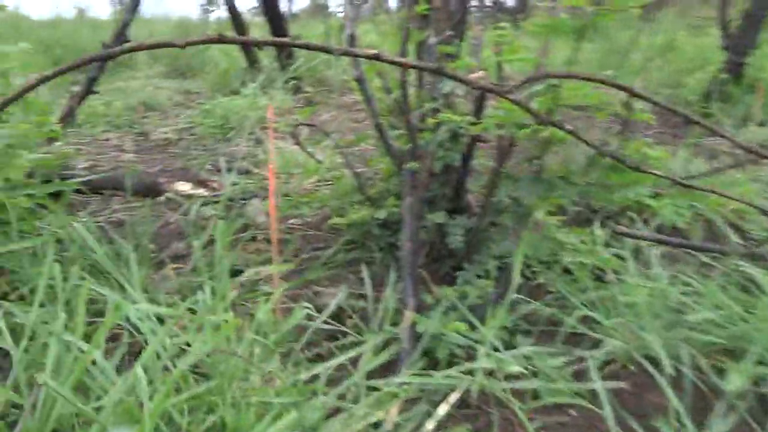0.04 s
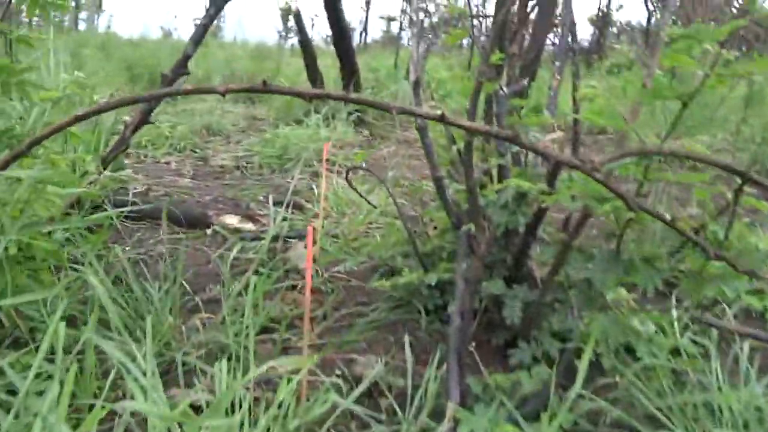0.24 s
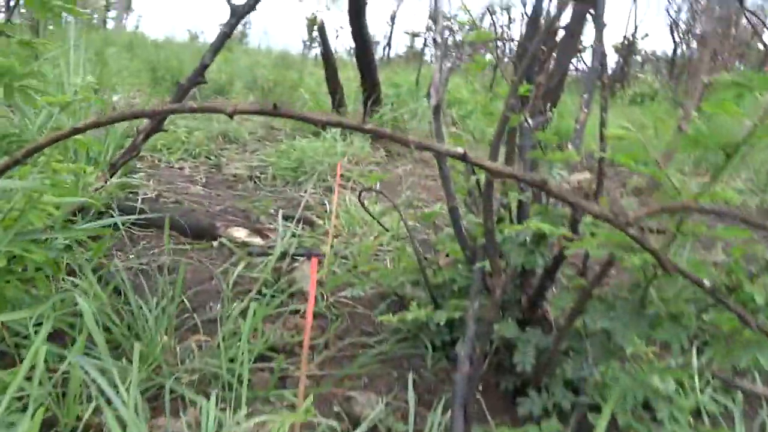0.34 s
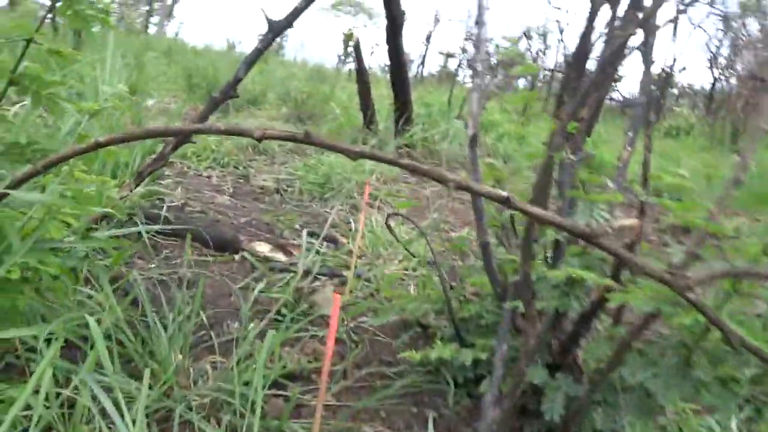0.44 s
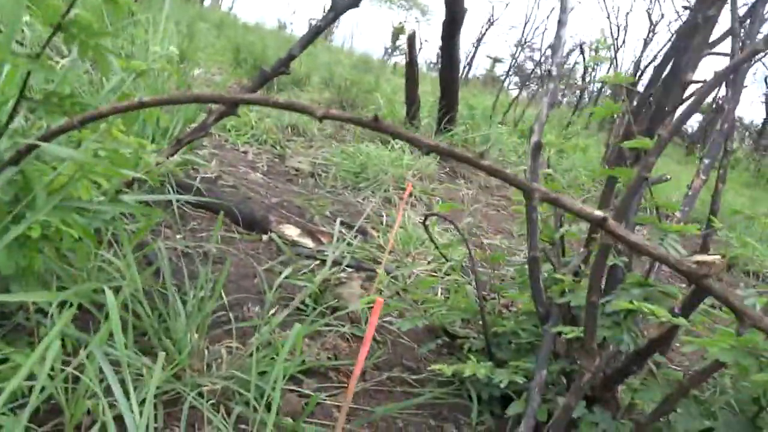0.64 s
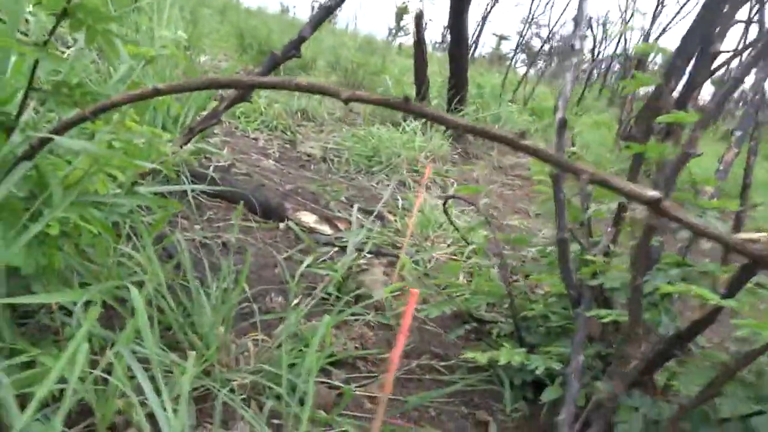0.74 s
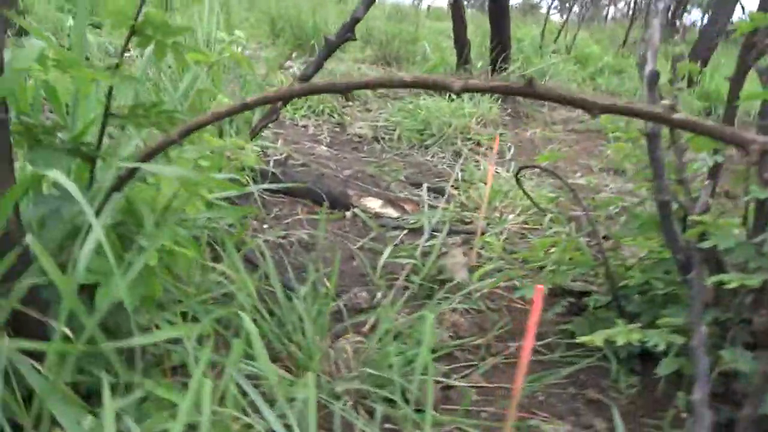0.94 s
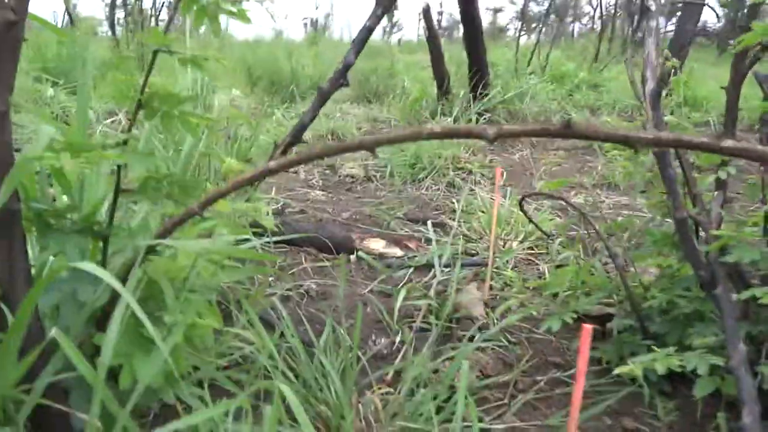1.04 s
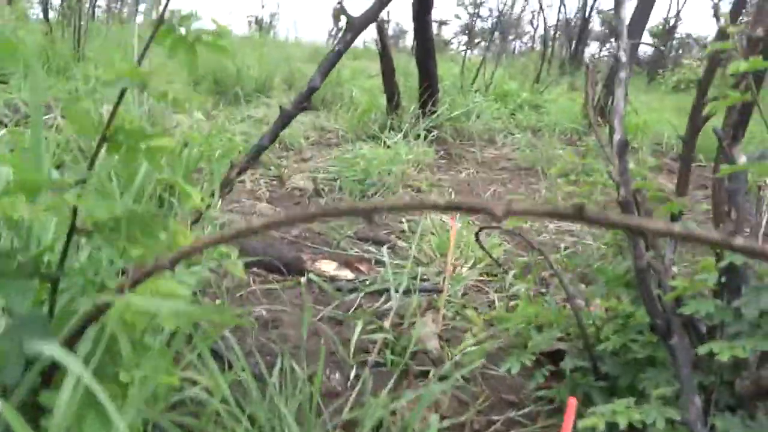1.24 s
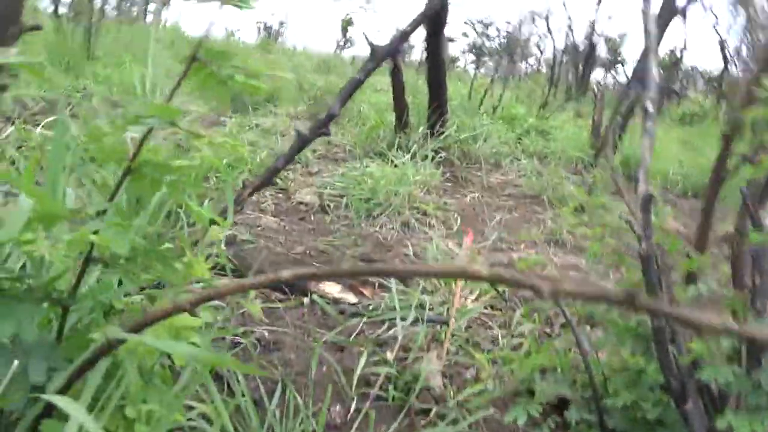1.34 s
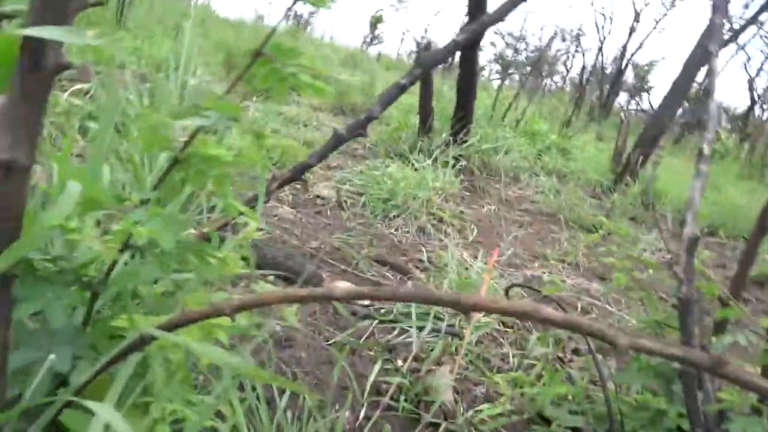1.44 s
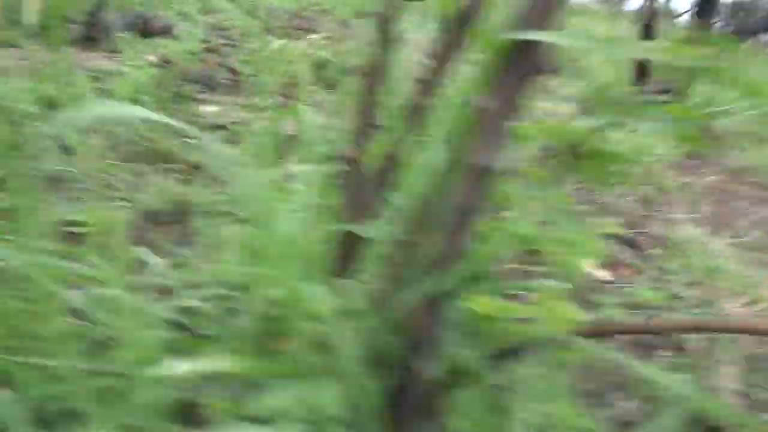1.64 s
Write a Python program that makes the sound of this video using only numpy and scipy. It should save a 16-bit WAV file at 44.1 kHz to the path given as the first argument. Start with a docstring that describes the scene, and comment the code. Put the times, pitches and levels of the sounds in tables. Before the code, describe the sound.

A crunching step through dry brush and grass, twigs snapping, with low rumble buffeting the microphone

```python
"""A step through tall grass and dry brush, close to a hand-held camera.
Over a faint outdoor hiss of shaped noise, low rumble buffets the microphone; a few faint, thin wavering tones
swell and fade. Blades and leaves swish past the legs as dense filtered grains, with brief scuffs among them.
Then the sole presses down: litter crumbles in dull grains, twigs crunch and dry stems snap as ringing fractures.
More buffets follow with soft low thumps of damped sine within them, and fainter cracks, snaps and swishes."""
import sys
import numpy as np
from scipy import signal
from scipy.fft import rfft, irfft, next_fast_len
from scipy.io import wavfile
from scipy.ndimage import uniform_filter1d, map_coordinates

SR = 44100
rng = np.random.default_rng(int(sys.argv[2]) if len(sys.argv) > 2 else 0)


def put_to_file(sound):
    """Save the sound as 16-bit audio at rate SR, in the file named by the first command-line argument."""
    columns = np.atleast_2d(sound).T  # one column per channel
    safe = np.clip(columns, -1, 1)
    whole_steps = np.round(safe * 32767)
    wavfile.write(sys.argv[1], SR, whole_steps.astype(np.int16))


N = 74970  # samples, 1.7 s
HIT_S, HIT_WINDOW_S = 0.08, 0.005  # length of a short hit, span its level refers to


def amp(db):
    """Decibels to gain."""
    return 10 ** (np.asarray(db) / 20)


def unit(x):
    """Scale to rms 1."""
    return x / np.sqrt(np.mean(x ** 2) + 1e-20)


def along(points, hz):
    """Read a curve of (Hz, value) points on a log frequency axis."""
    f, v = np.transpose(points)
    return np.interp(np.log(hz + 1), np.log(f + 1), v)


def curves(rows):
    """One value per sample for each column after the time."""
    s, *cols = np.transpose(rows)
    return [np.interp(np.arange(N) / SR, s, c) for c in cols]


def wobble(rate):
    """A smooth random curve, rate knots a second."""
    knots = rng.standard_normal(N // 20)
    return map_coordinates(knots, [np.arange(N) * rate / SR], mode="wrap")


def coloured(x, spectrum):
    """Filter x to a (Hz, dB) shape with minimum phase, so attacks stay sharp."""
    n = x.shape[-1]
    m = 2 * next_fast_len(n)
    gain = amp(along(spectrum, np.fft.rfftfreq(m, 1 / SR)))
    cepstrum = irfft(np.log(gain + 1e-6), m)
    # folding the cepstrum forward in time makes the filter causal
    cepstrum[1:m // 2] *= 2
    cepstrum[m // 2 + 1:] = 0
    response = np.exp(rfft(cepstrum))
    return irfft(rfft(x, m) * response, m)[..., :n]


def panned(x, pan_db):
    """Place a sound between left and right; positive leans left."""
    return x * amp(np.array([[pan_db], [-pan_db]]) / 2)


def spread(pair, side_db, pan_db):
    """Two unrelated sounds as the middle and the width of one stereo sound of rms 1."""
    mid = unit(pair[0])
    side = amp(side_db) * unit(pair[1])
    return unit(panned(np.array([mid + side, mid - side]), pan_db))


def grains(rate, scatter_db, smooth_db):
    """Two streams of tiny random ticks, rate a second, on a bed of noise."""
    struck = rng.random((2, N)) < rate / SR
    sign = rng.choice([-1, 1], (2, N))
    strength = amp(scatter_db * np.clip(rng.standard_normal((2, N)), -2, 2))
    bed = amp(smooth_db) * rng.standard_normal((2, N))
    return unit(struck * sign * strength) + bed


def patchy(x, depth_db):
    """Random gain patches over time and frequency: each leaf has its own colour."""
    z = signal.stft(x, nperseg=512)[2]
    field = rng.standard_normal(z.shape[1:])
    field = uniform_filter1d(field, size=7, axis=0)
    field = uniform_filter1d(field, size=12, axis=1)
    return signal.istft(z * amp(depth_db * unit(field)), nperseg=512)[1][:, :N]


def swells(rows, side_db, pan_db, skirt_db):
    """Short grainy swells of friction, changing by skirt_db an octave away from their own centre frequency."""
    out, t = np.zeros((2, N)), np.arange(N) / SR
    for s, length, db, hz in rows:
        band = [(hz * 2.0 ** octave, skirt_db * abs(octave)) for octave in range(-2, 3)]
        rub = coloured(grains(1500, scatter_db=2, smooth_db=-9.5), band)
        swell = np.exp(-(2 * (t - s) / length) ** 2 / 2)
        out += amp(db) * swell * spread(rub, side_db, pan_db)
    return out


def hit(x):
    """Scale a short sound so its energy equals rms 1 over the hit window."""
    return x / np.sqrt(np.sum(x ** 2) / (HIT_WINDOW_S * SR) + 1e-20)


def fracture(t60, spectrum, fibre_rate, break_db):
    """One sharp break, set break_db against the whole dying run of tearing fibres that follows."""
    t = np.arange(int(HIT_S * SR)) / SR
    torn = rng.random(len(t)) < fibre_rate / SR
    fibres = torn * rng.standard_normal(len(t)) * amp(-60 * t / t60)
    fibres[0] = rng.choice([-1, 1]) * amp(break_db) * np.linalg.norm(fibres)
    return hit(coloured(fibres, spectrum))


def ringing(push, hz, t60):
    """One damped mode driven by a push."""
    t = np.arange(len(push)) / SR
    mode = np.cos(2 * np.pi * hz * t) * amp(-60 * t / t60)
    return hit(signal.fftconvolve(push, mode)[:len(t)])


def add(out, s, x):
    """Mix x into out at time s."""
    i = max(round(s * SR), 0)
    out[:, i:i + x.shape[-1]] += x[..., :N - i]


def open_air():
    """Steady noise shaped into a faint, wide outdoor hiss."""
    # colour of the open air: f/Hz, level/dB
    air_colour = [(20, -11), (50, 23), (120, 0), (300, 1), (650, -1.5), (1500, 1.5), (2800, -5),
                  (3800, -10), (7300, -7.5), (8500, -9), (10400, -5), (16000, -24)]
    level_db = -54
    hiss = coloured(rng.standard_normal((2, N)), air_colour)
    return amp(level_db) * spread(hiss, side_db=-9, pan_db=0)


def buffeting():
    """Lumpy rumble shakes the camera and reaches the two sides a moment apart."""
    # strength of the buffets: t/s, level before trim/dB
    buffet_levels = [(0.0, -52.5), (0.08, -55.5), (0.132, -37.5), (0.16, -34.5), (0.178, -50),
                     (0.22, -38.5), (0.243, -24.5), (0.262, -48.5), (0.288, -24.5), (0.338, -28.5),
                     (0.375, -46), (0.397, -23.5), (0.425, -60), (0.458, -32.5), (0.492, -68), (0.58, -56),
                     (0.67, -42), (0.81, -56), (0.85, -39), (0.904, -53), (0.928, -38), (0.975, -80),
                     (1.014, -30.5), (1.034, -55), (1.06, -27), (1.11, -28.5), (1.15, -31), (1.175, -31),
                     (1.23, -39), (1.27, -43.5), (1.31, -59), (1.339, -44), (1.37, -63), (1.5, -59),
                     (1.535, -54), (1.64, -66), (1.68, -40.5), (1.7, -49)]
    # colour of the raw rumble: f/Hz, level/dB
    rumble_colour = [(15, -10), (30, 9), (50, -21.5), (80, -2), (115, -1.5), (180, -2.5), (250, -12),
                     (330, -18.5), (500, -25), (1000, -114)]
    trim_db = -4.5
    lag_s = 0.00063  # the left side is shaken slightly later than the right
    raw = coloured(rng.standard_normal(N), rumble_colour)
    # level out the noise's own lumps, so the level curve shapes the buffets
    even = raw / np.sqrt(np.abs(uniform_filter1d(raw ** 2, size=700)) + 1e-12)
    body = coloured(even, [(12, -39), (55, 19.0), (350, 4), (700, -25.5), (2000, -99)])
    level_db, = curves(buffet_levels)
    rumble = amp(level_db + trim_db) * unit(body)
    t = np.arange(N) / SR
    return np.array([np.interp(t - lag_s, t, rumble), rumble])


def grass():
    """Blades and broader leaves slide over each other in dense tiny slips."""
    # grass brushing past: t/s, treble level before trim/dB, upper-mid level before trim/dB
    swish_levels = [(0.0, -74, -65), (0.04, -59, -64), (0.08, -80.5, -91), (0.15, -54, -87),
                    (0.19, -74, -80), (0.22, -54, -63), (0.31, -62, -75), (0.38, -48.5, -54),
                    (0.48, -54, -60.5), (0.6, -43, -51), (0.66, -42, -51), (0.693, -49, -55),
                    (0.715, -41, -47), (0.8, -45, -54), (0.87, -46.5, -52), (0.95, -45.5, -55),
                    (0.99, -52, -56), (1.025, -42.5, -52), (1.053, -65, -61), (1.085, -63, -59),
                    (1.12, -51, -60.5), (1.19, -49, -53.5), (1.235, -51, -57), (1.25, -56, -72),
                    (1.285, -49, -60.5), (1.32, -55, -66), (1.42, -55.5, -65.5), (1.5, -53.5, -62.5),
                    (1.6, -50.5, -65.5), (1.7, -58.5, -68)]
    # colour of the thin blades: f/Hz, level/dB
    blade_colour = [(3800, -32), (6500, -14), (7500, -10), (8600, -9.5), (9500, -5.5), (10800, -0.5),
                    (11700, -5), (13000, -10.5), (14500, -16), (16000, -17)]
    # colour of the broader leaves: f/Hz, level/dB
    leaf_colour = [(1000, -43), (2200, 9.5), (2800, 8), (3400, 4.5), (4000, 4), (4800, 8), (5700, 7),
                   (7200, 4), (9000, -39), (13000, -20), (16000, 0)]
    blade_trim_db, leaf_trim_db = -1.5, 0.5
    treble_db, mids_db = curves(swish_levels)
    blades = coloured(grains(5800, scatter_db=9, smooth_db=2), blade_colour)
    blades = spread(patchy(blades, depth_db=3.2), side_db=-17.5, pan_db=-2.0)
    leaves = coloured(grains(1400, scatter_db=1.0, smooth_db=-2.5), leaf_colour)
    leaves = spread(patchy(leaves, depth_db=1.5), side_db=-7, pan_db=0.5)
    blade_gain = amp(treble_db + blade_trim_db + 0.69 * wobble(70.04))
    leaf_gain = amp(mids_db + leaf_trim_db + 1.5 * wobble(49.1))
    return blade_gain * blades + leaf_gain * leaves


def tread():
    """Litter crumbles under the sole in separate dull grains."""
    # pressure of the sole on the litter: t/s, level before trim/dB
    tread_levels = [(0.0, -67.5), (0.3, -63), (0.5, -54), (0.595, -51.5), (0.61, -42), (0.662, -41),
                    (0.693, -48.5), (0.722, -39), (0.745, -38.5), (0.775, -37), (0.805, -42.5), (0.84, -43),
                    (0.885, -47), (0.95, -49.5), (1.04, -53.5), (1.1, -63), (1.15, -47.5), (1.22, -54.5),
                    (1.3, -54.5), (1.4, -66.5), (1.465, -53), (1.5, -57), (1.57, -54.5), (1.66, -62.5),
                    (1.7, -53)]
    # colour of the crumbling litter: f/Hz, level/dB
    litter_colour = [(100, -3), (200, -7.5), (290, -2), (380, 1.5), (530, 1.5), (720, -2.5), (950, -1),
                     (1400, -3.5), (1850, -7.5), (2500, -29), (4000, -75), (9000, -104)]
    trim_db = -1.5
    level_db, = curves(tread_levels)
    crumble = coloured(grains(650, scatter_db=0.5, smooth_db=-12), litter_colour)
    gain = amp(level_db + trim_db + 1.05 * wobble(89.7))
    return gain * spread(crumble, side_db=-15.5, pan_db=1.5)


def thin_tones():
    """A few faint, thin sine tones of wavering pitch swell and fade."""
    # faint tones: centre t/s, length/s, level/dB, f/Hz
    tone_rows = [(0.033, 0.078, -64, 3210), (0.038, 0.03, -65.5, 7500), (0.148, 0.0099, -56.5, 7470),
                 (0.163, 0.0088, -71, 7660)]
    waver_hz = 89.4
    out, t = np.zeros(N), np.arange(N) / SR
    for s, length, db, hz in tone_rows:
        phase = 2 * np.pi * np.cumsum(hz + waver_hz * wobble(150)) / SR
        swell = np.exp(-2 * ((t - s) / length) ** 2)
        out += amp(db) * swell * unit(np.sin(phase))
    return out


def stems():
    """Dry stems splinter, and each rings briefly at its own pitch."""
    # snaps: t/s, level before trim/dB, ring f/Hz, ring level against the splintering/dB, ring t60/s,
    # splintering t60/s, muffled above f/Hz, left-right balance/dB
    snap_rows = [(0.108, -51.5, 3000, 4, 0.0082, 0.015, 4860, -13),
                 (0.7185, -30, 3900, -7.5, 0.0084, 0.0095, 3950, 5),
                 (0.729, -25.5, 9500, 10, 0.0027, 0.016, 15100, -4),
                 (0.7358, -28, 13300, 22, 0.003, 0.031, 15100, -1),
                 (0.7544, -29, 6400, -1.5, 0.0077, 0.063, 8000, 4.5),
                 (0.762, -19, 10700, -10, 0.0059, 0.013, 14100, -2.5),
                 (0.786, -19, 10460, -4.5, 0.0077, 0.017, 14300, 3),
                 (0.8044, -31.5, 10000, -18, 0.0074, 0.014, 15000, -5),
                 (0.828, -26.5, 8320, -3.5, 0.015, 0.033, 8800, -0.5),
                 (1.0698, -32, 2250, -2.5, 0.012, 0.0028, 7300, -5.5),
                 (1.0683, -35.5, 1390, 33, 0.012, 0.0077, 2980, -8),
                 (1.138, -42.5, 2260, 7, 0.017, 0.0061, 6400, 3),
                 (1.211, -45.5, 2760, 19, 0.0044, 0.027, 3520, -10),
                 (1.454, -37.5, 10900, 8, 0.0033, 0.0042, 14000, -2.5)]
    # colour of the splintering before muffling: f/Hz, level/dB
    splinter_colour = [(500, -49), (1500, -7.5), (2900, -14), (3900, -10), (6500, -6.5), (9000, -9),
                       (9900, 7.5), (10800, 4), (12000, 1), (14200, -4.5), (16000, -16)]
    trim_db, muffle_db_per_octave = -5, -17.5
    out = np.zeros((2, N))
    for s, db, hz, ring_db, ring_t60, t60, top_hz, pan_db in snap_rows:
        colour = [(f, level + muffle_db_per_octave * max(np.log2(f / top_hz), 0))
                  for f, level in splinter_colour]
        crack = fracture(t60, colour, fibre_rate=13000, break_db=-9)
        snap = hit(crack + amp(ring_db) * ringing(crack, hz, ring_t60))
        add(out, s, panned(amp(db + trim_db) * snap, pan_db))
    return out


def brush(x):
    """A short diffuse answer from the ground and the bushes: x through decaying noise."""
    # thin stems scatter little bass: f/Hz, level/dB
    scatter_colour = [(300, -21), (1500, 2)]
    t60_s = 0.066
    t = np.arange(SR // 4) / SR
    tail = coloured(rng.standard_normal((2, len(t))), scatter_colour) * amp(-60 * t / t60_s)
    return signal.fftconvolve(x, tail / np.linalg.norm(tail[0]), axes=1)[:, :N]


def scuffs():
    """Leaves scuff past in brief grainy swells of friction."""
    # scuffs: centre t/s, length/s, level/dB, centre f/Hz
    scuff_rows = [(0.154, 0.017, -61, 7050), (0.78, 0.0086, -31, 10700), (0.95, 0.071, -53.5, 2570),
                  (1.014, 0.011, -45.5, 1620), (1.019, 0.016, -45, 3600), (1.082, 0.03, -44, 9400),
                  (1.226, 0.025, -50.5, 1250)]
    return swells(scuff_rows, side_db=-10.5, pan_db=-4.5, skirt_db=-18)


def twigs():
    """Twigs give way with short woody knocks, muffled by the foot."""
    # cracks under the sole: t/s, level before trim/dB, ring f/Hz, ring level against the crack/dB
    crack_rows = [(0.481, -37.5, 1430, 3), (0.6268, -23.5, 1820, -7.5), (0.649, -27, 527, 23),
                  (0.6605, -31, 960, 7), (0.672, -32, 1110, -14), (0.7002, -25, 1700, -10.5),
                  (0.7149, -28, 530, 13), (0.7185, -28, 1280, 10), (0.7265, -28, 680, -14),
                  (0.7525, -35.5, 1900, -7), (0.7625, -23, 1050, 8), (0.767, -28, 566, 0),
                  (0.775, -27.5, 910, -11), (0.789, -26.5, 597, -17), (0.8195, -27, 750, -8),
                  (0.829, -26, 740, -22), (0.8575, -29.5, 1720, -1), (1.0705, -39.5, 950, 3),
                  (1.2117, -46, 1330, 9), (1.236, -43, 1250, 1), (1.561, -36.5, 1300, 0),
                  (1.685, -40.5, 440, 11)]
    # colour of a breaking twig: f/Hz, level/dB
    twig_colour = [(120, -10.5), (300, -9.5), (560, 2.5), (950, -0.5), (1400, -10.5), (1900, -13.5),
                   (2300, -15.5), (2800, -33.5), (8000, -40)]
    trim_db = -7.5
    crack_t60_s, ring_t60_s = 0.011, 0.022
    out = np.zeros((2, N))
    for s, db, hz, ring_db in crack_rows:
        crack = fracture(crack_t60_s, twig_colour, fibre_rate=9400, break_db=-5)
        knock = hit(crack + amp(ring_db) * ringing(crack, hz, ring_t60_s))
        add(out, s, panned(amp(db + trim_db) * knock, pan_db=2.0))
    return out


def pushes():
    """The foot pushes dully on the soil in low, almost central swells of friction."""
    # pushes: centre t/s, length/s, level/dB, centre f/Hz
    push_rows = [(0.72, 0.03, -41.5, 317), (0.78, 0.033, -37, 265), (0.848, 0.018, -38.5, 286),
                 (1.1, 0.052, -48.5, 344), (1.28, 0.013, -51.5, 505), (1.466, 0.022, -56, 650)]
    return swells(push_rows, side_db=-39, pan_db=0.5, skirt_db=-20)


def thumps():
    """Each thump is a few low cycles of a sine that rises softly and dies away."""
    # soft low thumps within the later buffets: t/s, peak level/dB, f/Hz
    thump_rows = [(1.047, -22, 153), (1.084, -29.5, 144), (1.102, -31.5, 245), (1.133, -34.5, 174)]
    rise_s, t60_s = 0.0095, 0.039
    out, t = np.zeros((2, N)), np.arange(int(HIT_S * SR)) / SR
    shape = (1 - np.exp(-(t / rise_s) ** 2)) * amp(-60 * t / t60_s)
    for s, db, hz in thump_rows:
        cycles = np.sin(2 * np.pi * (hz * t + rng.random()))
        add(out, s, amp(db) * shape / shape.max() * cycles)
    return out


def scene():
    """The step, the grass and the buffets over the open-air hiss."""
    brush_db = -9.5  # scatter from the surrounding brush
    breaks = stems() + twigs()
    step = tread() + breaks + amp(brush_db) * brush(breaks) + pushes()
    foliage = grass() + scuffs()
    return open_air() + buffeting() + foliage + thin_tones() + step + thumps()


def record(dry):
    """The camera keeps nothing above its band limit."""
    top_hz = 15950
    m = next_fast_len(N + SR // 2)
    kept = np.fft.rfftfreq(m, 1 / SR) < top_hz
    return irfft(rfft(dry, m) * kept, m)[:, :N]


dry = scene()
out = record(dry)
put_to_file(out)
```